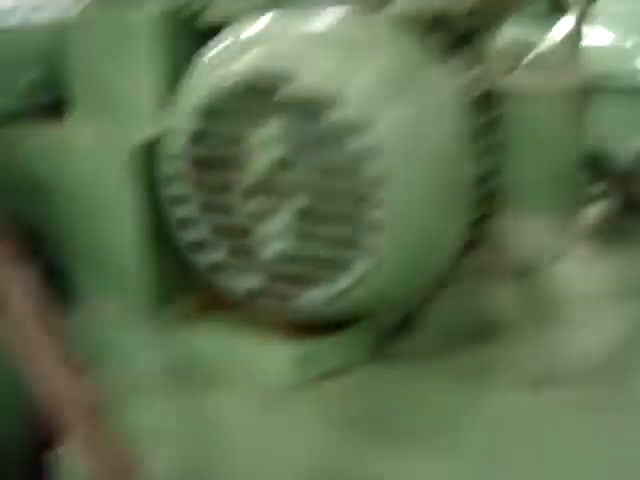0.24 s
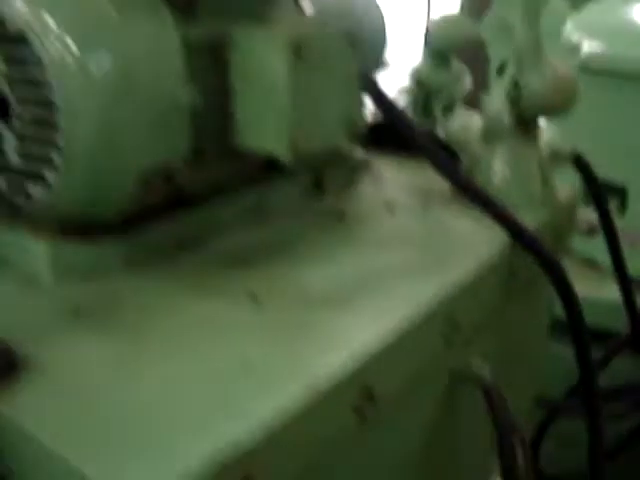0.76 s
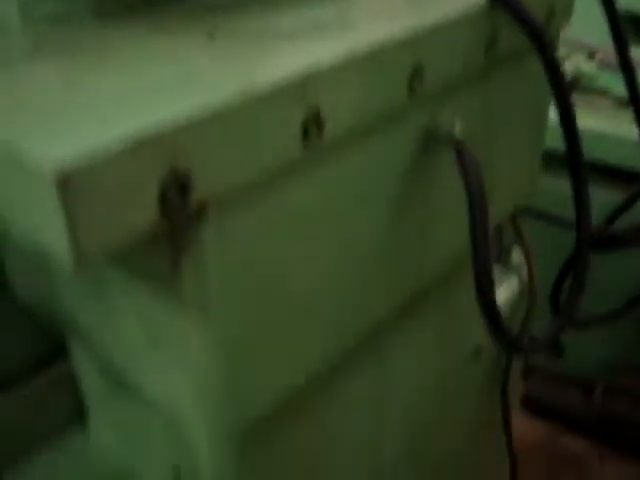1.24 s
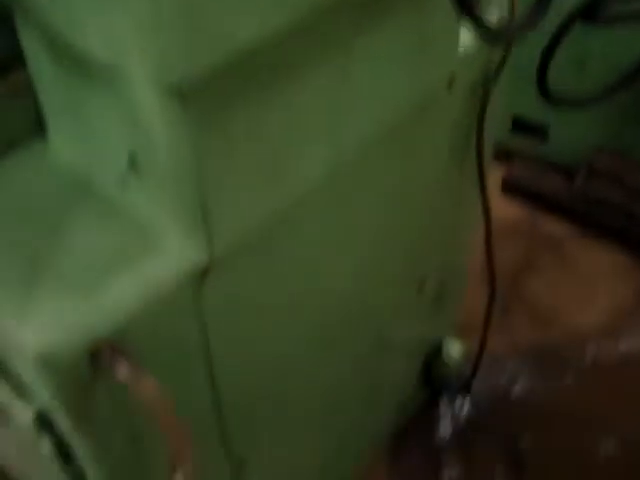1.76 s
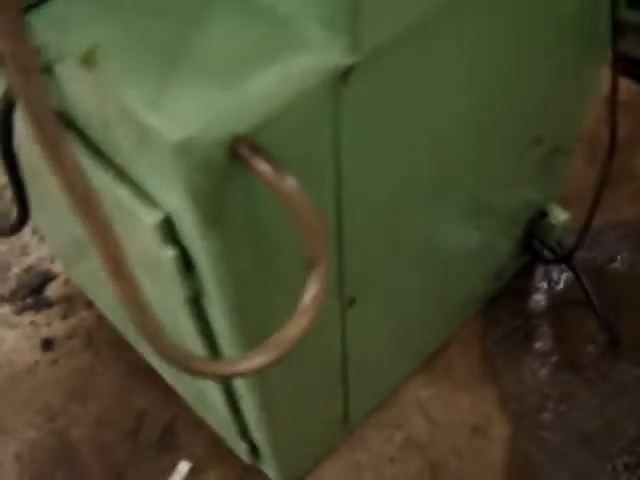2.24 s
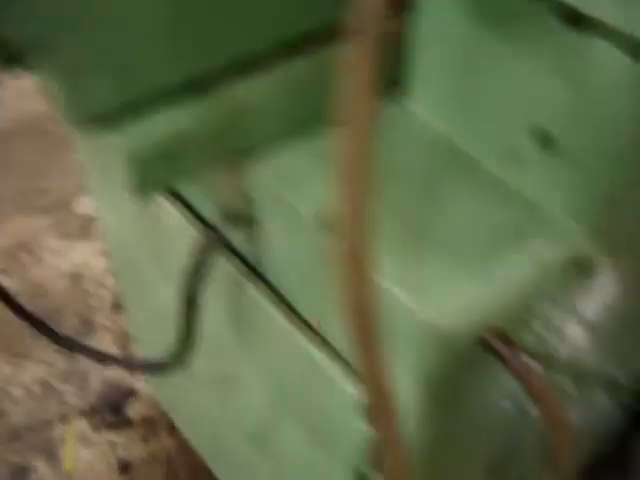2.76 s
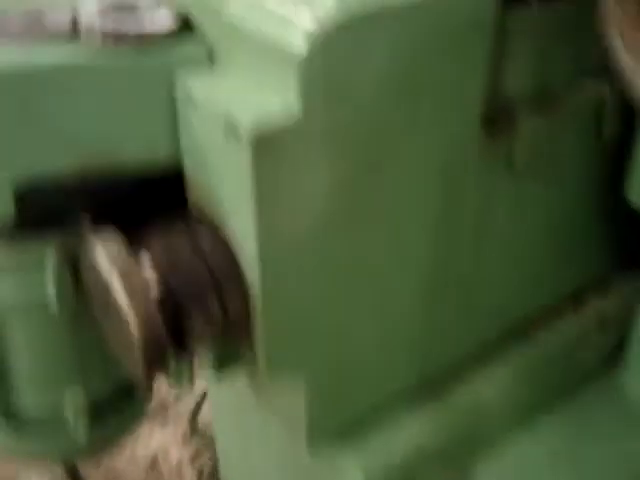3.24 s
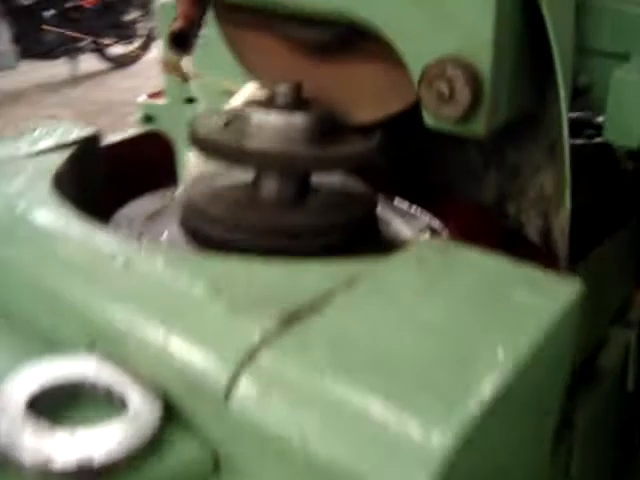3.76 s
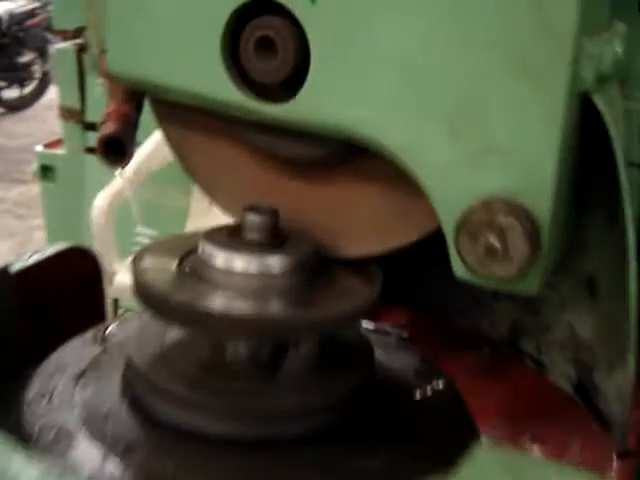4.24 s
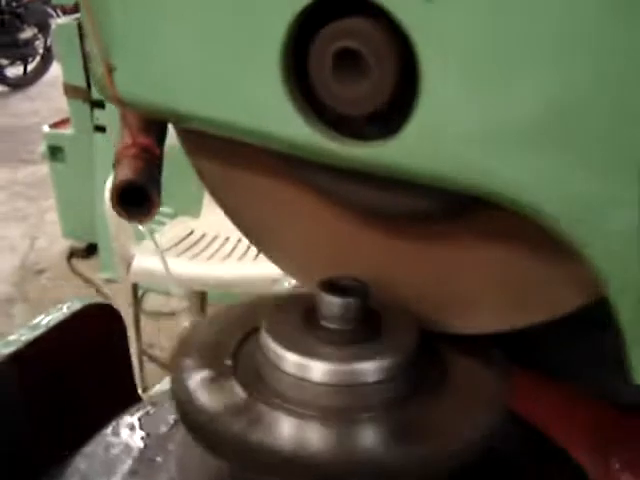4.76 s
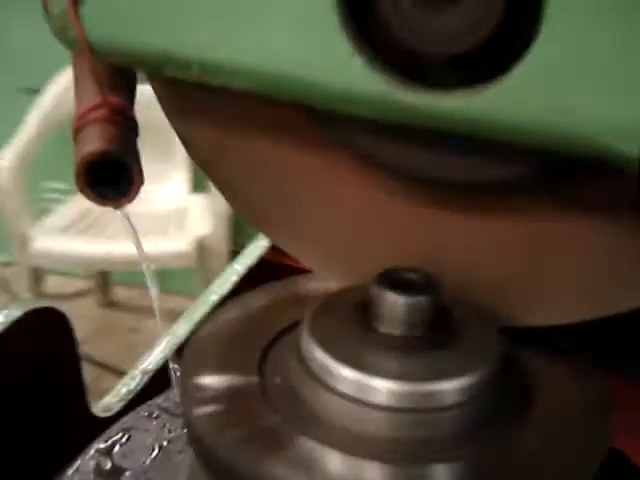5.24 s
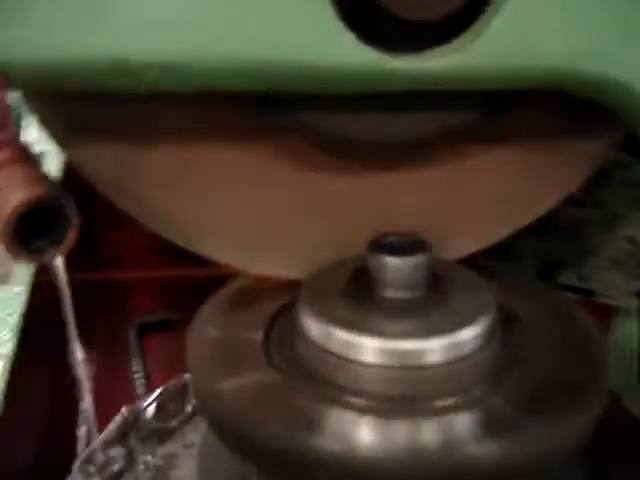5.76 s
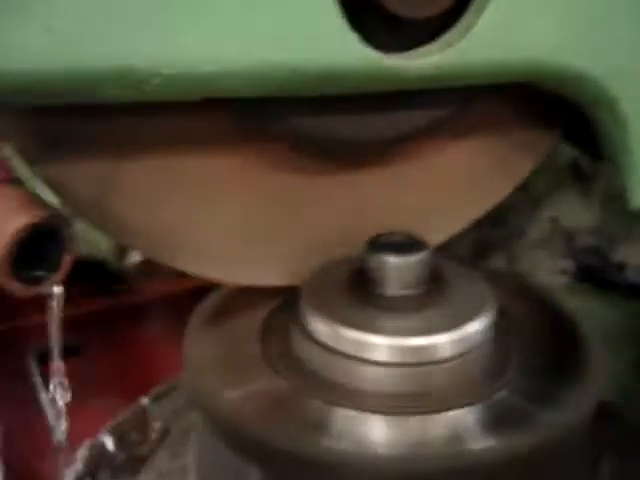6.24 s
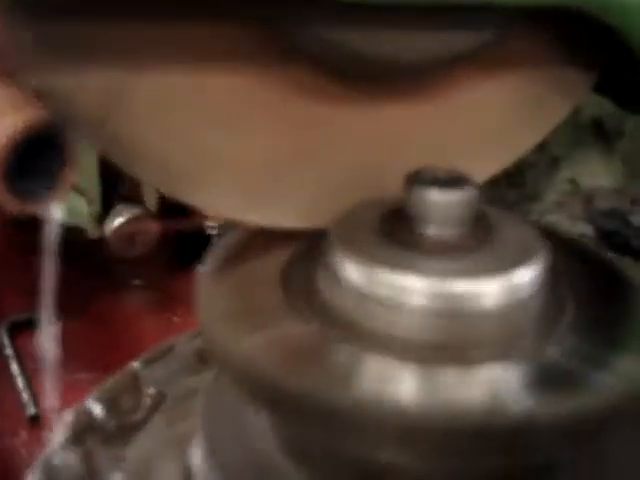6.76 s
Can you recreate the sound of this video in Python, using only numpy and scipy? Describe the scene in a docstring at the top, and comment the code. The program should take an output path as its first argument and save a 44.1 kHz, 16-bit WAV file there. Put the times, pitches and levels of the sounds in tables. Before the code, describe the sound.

Close, continuous machine noise: throbbing mid-low rumble, wavering motor tones and pump whine, then sharper metallic grinding hiss as the microphone nears the wheel.

```python
"""A workshop, where a mono microphone is carried past the hydraulic pump of a wet grinding machine round to its wheel.
The pump whines in harmonics; motors and spindle hold tones; the drive throbs as shaped noise in the cast base.
The wheel's grit, noise that partly repeats every turn, scrapes a steel disc; disc and guard ring and hiss.
Coolant drops patter faintly against the guard."""
import sys
import numpy as np
from scipy import signal
from scipy.fft import rfft, irfft, next_fast_len
from scipy.io import wavfile
from scipy.ndimage import uniform_filter1d, map_coordinates

SR = 44100
rng = np.random.default_rng(int(sys.argv[2]) if len(sys.argv) > 2 else 0)


def master(y):
    """Save y as 16-bit WAV."""
    cut = np.clip(np.atleast_2d(y).T, -1, 1)
    pcm = np.round(cut * 32767)  # scale
    wavfile.write(sys.argv[1], SR, pcm.astype(np.int16))


N = 309141
TOP_HZ = 10050  # band limit of grit and recorder
WHEEL_HZ = 41.8

# loudness of the cast base along the walk: t/s, level/dB
BASE_LEVEL = [(0, -23), (.5, -25), (1.4, -24), (2.3, -22), (2.85, -20.5), (3.4, -23), (3.8, -24.5),
              (4.3, -26), (5.2, -28), (5.7, -31.4), (6.1, -30.5), (6.6, -27.5), (7, -28)]


def amp(db):
    """Decibels to gain."""
    return 10 ** (np.asarray(db) / 20)


def unit(x):
    """Scale to rms 1."""
    return x / np.sqrt(np.mean(x ** 2) + 1e-20)


def curves(rows):
    """One value per sample for each column after the time."""
    t_s, *cols = np.transpose(rows)
    return [np.interp(np.arange(N) / SR, t_s, c) for c in cols]


def wobble(rate_hz):
    """Smooth random curve with rate_hz knots a second."""
    knots = rng.standard_normal(4096)
    coarse = np.arange(0, N + 32, 32)
    values = map_coordinates(knots, [coarse * rate_hz / SR], mode="wrap")
    return np.interp(np.arange(N), coarse, values)


def nearness(t_s, half_s):
    """Inverse-square bell: 1 at t_s, where the microphone is nearest, and 1/2 at half_s either side."""
    return 1 / (1 + ((np.arange(N) / SR - t_s) / half_s) ** 2)


def filtered(x, response):
    """x times a response of frequency."""
    m = next_fast_len(N + 8192)
    return irfft(rfft(x, m) * response(np.fft.rfftfreq(m, 1 / SR)), m)[:N]


def coloured(x, points):
    """x shaped by (f/Hz, relative level/dB) points, falling away beyond their ends, at rms 1."""
    f_hz, db = np.transpose(points)
    log_f = np.log(np.r_[f_hz[0] / 2, f_hz, f_hz[-1] * 2])
    db = np.r_[db[0] - 20, db, -120]
    return unit(filtered(x, lambda hz: amp(np.interp(np.log(hz + 1), log_f, db, left=-120))))


def resonance(f, hz, width_hz):
    """Response of one mode, 1 at its centre."""
    return 1j * f * width_hz / (hz * hz - f * f + 1j * f * width_hz)


def blend(a, b, share):
    """Equal-power mix with the given share of b."""
    share = np.clip(share, 0, 1)
    return np.sqrt(1 - share) * a + np.sqrt(share) * b


def turns(hz, drift, flutter):
    """Running count of cycles of a shaft whose speed wanders slightly, slowly (drift) and fast (flutter)."""
    return np.cumsum(hz * (1 + drift * wobble(2) + flutter * wobble(25))) / SR


def tone(hz, flutter, waver_db):
    """Held tone of rms 1 that wavers in pitch and strength."""
    cycles = turns(hz, drift=0.000915, flutter=flutter)
    return unit(np.sin(2 * np.pi * cycles) * amp(waver_db * wobble(9)))


def wall_echo(x):
    """A close wall adds a copy half a period late, which cuts a gliding notch."""
    # tank wall as the microphone slides down it: t/s, notch f/Hz, echo strength 0-1
    wall = [(.6, 427, 0), (1.1, 486, 0.15), (1.4, 550, 0.12), (1.65, 637, 0.1), (2.0, 690, 0.26),
            (2.6, 700, 0.2)]
    notch_hz, strength = curves(wall)
    n = np.arange(N)
    echo = np.interp(n - SR / (2 * notch_hz), n, x)
    return (x + strength * echo) / np.sqrt(1 + strength ** 2)


def standing_waves(x, patchy_db):
    """Narrow bands swell and fade as the microphone moves among hard surfaces."""
    z = signal.stft(x, nperseg=1024)[2]
    field = rng.standard_normal(z.shape)
    for _ in range(2):
        field = uniform_filter1d(field, size=4, axis=0)
        field = uniform_filter1d(field, size=40, axis=1)
    return signal.istft(z * amp(patchy_db * unit(field)), nperseg=1024)[1][:N]


def coolant(front):
    """Drops flung off the wheel patter faintly: random impulses excite two broad modes of the guard."""
    drops = rng.uniform(size=(900, 2))
    at = (drops[:, 0] * (N - 1)).astype(int)
    ticks = np.bincount(at, drops[:, 1] ** 2, N)
    splash = filtered(ticks, lambda f: resonance(f, 2680, 2000) ** 2 + resonance(f, 6000, 1800) ** 2)
    return amp(-40.0 + 7.5 * front) * unit(splash)


def pump(front):
    """Vanes whine in harmonics that swell as the microphone crosses crests of the room's standing waves."""
    pump_hz, shadow_db = 393.8, 8  # shadow: loss with the machine between pump and microphone
    # harmonics: multiple of pump_hz, level/dB away from crests and shadow
    vane_orders = [(3, -40), (4, -42.5), (5, -42.5), (6, -38), (7, -41), (8, -43), (9, -40.5), (11, -47.5),
                   (14, -42.5)]
    # standing-wave crests: multiple of pump_hz, t/s, half time/s, lift/dB
    vane_crests = [(3, .4, 0.37, 6), (4, 0.83, 0.54, 9), (4, 4.35, .45, 8.5), (5, 1, 0.31, 9.5),
                   (6, 2.11, 0.33, 8), (6, 0.27, .4, 6), (8, 0.22, .8, 10), (9, 1.3, 0.45, 4.5)]
    vane = 2 * np.pi * turns(pump_hz, drift=0.000519, flutter=0.00086)
    whine = 0
    for order, db in vane_orders:
        crest_db = sum(lift_db * nearness(t_s, half_s) for k, t_s, half_s, lift_db in vane_crests if k == order)
        level_db = db + crest_db + 1.0 * wobble(1.7) + 0.63 * wobble(11)
        harmonic = np.sin(order * vane + rng.uniform(0, 2 * np.pi))
        whine = whine + amp(level_db) * unit(harmonic)
    return amp(-shadow_db * front ** 3) * whine


def drive(front):
    """Spindle and motors hold wavering tones, and steady lines sound behind and in front of the machine; the
    spindle's drone lies near twelve times the wheel's speed."""
    drone_hz = 502.8
    # spindle drone, with a dead spot behind the tank: t/s, level/dB
    drone_level = [(0, -32.5), (.3, -25.5), (.7, -29), (1.05, -62), (1.5, -54), (1.85, -32.5), (2.55, -36),
                   (2.85, -28.5), (3.5, -32), (4.2, -30), (4.6, -30.5), (5.3, -26.5), (5.8, -31),
                   (6.4, -25.5), (7, -29.5)]
    # held tones of motors and spindle: name: (f/Hz, flutter share)
    held_tones = {"hum": (85.5, .012), "upper drone": (543.7, .0065), "whine": (1223, .004),
                  "whistle": (3763, .0015), "squeal": (8625, .002)}
    # where they are strong: tone name, nearest t/s, half time/s, level when nearest/dB
    held_passes = [("hum", 2.5, 1, -53), ("upper drone", 2.22, 0.22, -32.5),
                   ("upper drone", 3.06, 0.37, -29), ("upper drone", 4.74, 0.73, -28.5),
                   ("whine", 4.38, 0.68, -38), ("whistle", 3.6, 1, -35), ("squeal", 5.18, 0.33, -33.5)]
    # steady tones behind the machine, in front of it: f/Hz, level/dB
    rear_tones = [(134.6, -55.5), (269.2, -47), (753.7, -35), (1044, -37.5)]
    front_tones = [(251, -53), (314, -48.5), (461, -51.5), (640, -43.5), (1008, -42), (2547, -40),
                   (2757, -36.5)]
    drone_db, = curves(drone_level)
    held = amp(drone_db) * tone(drone_hz, flutter=.002, waver_db=.8)
    for name, (hz, flutter) in held_tones.items():
        passes = [row[1:] for row in held_passes if row[0] == name]
        strength = sum(amp(db) * nearness(t_s, half_s) for t_s, half_s, db in passes)
        held = held + strength * tone(hz, flutter, waver_db=2.4)
    rear = sum(amp(db) * tone(hz, flutter=0.00474, waver_db=2.5) for hz, db in rear_tones)
    ahead = sum(amp(db) * tone(hz, flutter=0.001705, waver_db=1.5) for hz, db in front_tones)
    return held + blend(rear, ahead, front)


def base(front, belt):
    """The drive shakes cast base and panels: noise throbbing with the pump's belt behind, the wheel's in front."""
    pump_belt_hz = 19.0
    # rumble spectra behind, in front: f/Hz, relative level/dB
    base_rear = [(25, -37.5), (70, -20), (120, -24.5), (175, -22), (215, -7.5), (340, -9), (410, -3.5),
                 (470, -3), (620, 3.5), (700, 2), (780, 1.5), (900, 1), (1230, -5.5), (1400, -30.5)]
    base_front = [(25, -33), (70, -29), (150, -21), (210, -11.5), (350, -12), (400, -1), (530, 3),
                  (600, 1.5), (720, -1), (810, 3.5), (880, 0), (1130, -6.5), (1250, -1), (1400, -57)]
    # sheet panels passed in turn: f/Hz, width/Hz, nearest t/s, half time/s, level when nearest/dB
    panel_passes = [(209, 32, 2.2, 0.46, -38.5), (272.2, 32, 1.84, 1.8, -42), (406.7, 21, 1.5, 1.03, -31.5),
                    (607, 30, 1.046, 0.24, -25.5), (781, 77, 1.52, 0.82, -26.5),
                    (1050, 90, 2.75, 0.23, -27.5)]
    base_db, = curves(BASE_LEVEL)
    pump_belt = 2 * np.pi * turns(pump_belt_hz, drift=.005, flutter=.01)
    throb = np.cos(pump_belt) + .5 * np.cos(2 * pump_belt)
    surge = unit(amp(2.1 * (1 - front) * throb + 1.3 * front * belt))
    rear = wall_echo(coloured(rng.standard_normal(N), base_rear))
    ahead = coloured(rng.standard_normal(N), base_front)
    rumble = amp(base_db + 0.5 + 0.5 * front) * blend(rear, ahead, front)
    for hz, width_hz, t_s, half_s, db in panel_passes:
        panel = filtered(rng.standard_normal(N), lambda f: resonance(f, hz, width_hz) ** 2)
        rumble = rumble + amp(db) * nearness(t_s, half_s) * unit(panel)
    return surge * rumble


def grit(wheel, repeat):
    """Scraping noise: the face replays its roughness each turn, mixed with grains that break off anew."""
    count = int(TOP_HZ / WHEEL_HZ)
    bumps = amp(2.6 * rng.standard_normal(count)) * np.exp(2j * np.pi * rng.uniform(size=count))
    face = unit(irfft(np.r_[0, bumps], 8192)) * np.sqrt(2 * TOP_HZ / SR)  # density of the white noise
    same = np.interp(wheel % 1, np.arange(len(face)) / len(face), face)
    return blend(rng.standard_normal(N), same, repeat)


def bite(wheel, front):
    """Cutting force of the slightly oval wheel; each part feels it at its own point of the turn."""
    angle = 2 * np.pi * (wheel + rng.uniform())
    oval = 1.3 * np.cos(angle) + 1.93 * np.cos(2 * angle) + 1.0 * np.cos(3 * angle)
    chatter = np.cos(12 * angle)
    force_db = (0.9 + 0.55 * front) * oval + 0.81 * chatter + 0.47 * wobble(18) + 1.5 * wobble(70)
    return unit(amp(force_db))


def sing(x, share):
    """A resonance driven by friction saturates: its strength evens out and it sings steadily."""
    strength = np.abs(signal.hilbert(x, next_fast_len(N))[:N])
    return x / (strength / strength.mean() + .1) ** np.clip(share, 0, 1)


def steel_ring(front, belt, work, wheel, forces, guard_db, disc_db):
    """Modes of guard, disc and rim ring under the grit, most of them beaming into one stretch of the walk."""
    disc_from_hz, rim_from_hz = 4800, 6300
    # modes: f/Hz, width/Hz, level against guard or disc/dB, gain at wheel/dB, beam axis t/s, beam half time/s,
    # beam lift/dB, share repeating each turn 0-1, belt throb/dB, work throb/dB (throbs at the wheel), singing 0-1
    steel = [(2090, 380, -10, 3, 5.4, 0.39, 1.5, 0.1, 4, -0.5, 0.15),
             (2673, 326, -9, 3.5, 3, 0.91, 5, 0.54, -1.5, -0.7, 0.24),
             (3980, 195, -20, 11, 3.6, 0.86, 5.5, 0.7, -1.5, -1, 0.56),
             (5233, 420, -12.5, -4.5, 4.93, 0.8, 12, 0.64, -1.5, 4, 0.46),
             (5630, 800, -6, -1.5, 1.4, 1, 6.5, 0.5, -1.7, 2.5, 0.06),
             (6130, 310, -23.5, 8.5, 5.56, 0.41, 8.5, 0.3, -3, -4.5, .05),
             (6697, 350, -4.5, -1.5, 3.6, 0.71, 2.5, 0.49, 1.2, 1, 0),
             (7675, 460, -15, 4.5, 13, 0.71, 12, 0, 0.5, -4, 0),
             (8880, 200, -26, 2.5, 6.5, 0.72, 15.5, 0.5, -3, 5, 0)]
    on_guard, on_disc, on_rim = forces
    ring = 0
    for hz, width_hz, db, front_db, t_s, half_s, lift_db, repeat, belt_db, work_db, singing in steel:
        if hz < disc_from_hz:
            force, part_db = on_guard, guard_db
        else:
            force, part_db = (on_disc if hz < rim_from_hz else on_rim), disc_db
        mode = filtered(force * grit(wheel, repeat), lambda f: resonance(f, hz, width_hz) ** 2)
        throb_db = (.4 + .6 * front) * (belt_db * belt + work_db * work) + 1.3 * wobble(35)
        level_db = part_db + db + front_db * front + lift_db * nearness(t_s, half_s)
        ring = ring + amp(level_db) * unit(sing(mode * amp(throb_db), singing))
    return ring


def grinding(front, belt):
    """Grit scrapes, rasps, hisses and rings the steel; wheel belt and turning work make it throb."""
    work_hz = 9.8
    # loudness of guard, disc and sizzling spray along the walk: t/s, level/dB
    guard_level = [(0, -24.5), (1, -27), (2.3, -28), (3.2, -25.5), (3.45, -23), (3.7, -25), (4.25, -23),
                   (5.2, -24), (6.05, -31.5), (6.45, -25), (7, -25.5)]
    disc_level = [(0.0, -24.5), (0.53, -30), (0.8, -26.5), (1.09, -29), (1.54, -27.5), (2.73, -30),
                  (2.95, -24.5), (3.08, -28), (3.55, -22), (4.63, -24.5), (5.45, -21.5), (6.4, -24),
                  (6.95, -21.5), (7.01, -21.5)]
    spray_level = [(0, -33), (1, -36), (2.2, -39), (3, -35.5), (4.2, -32.5), (4.8, -35), (5.6, -29),
                   (7, -31)]
    # noise spectra: f/Hz, relative level/dB
    scrape_points = [(600, -45), (1300, 1.5), (1750, -1), (2400, -0.5), (2900, -7), (3400, -0.5)]
    rasp_points = [(2300, -18), (3050, -2), (3450, 2.5), (3800, 2.5), (4300, -3.5), (4900, -0.5),
                   (6000, -40)]
    hiss_points = [(4000, -32.5), (4850, -16.5), (5120, 4.5), (5500, 4.5), (5900, -5.5), (6400, 14),
                   (7150, 3), (7700, -8), (10000, -34)]
    spray_points = [(5500, -50), (7200, 9), (7950, 0.5), (8350, 4), (8700, 5), (9200, 2.5), (10000, 1)]
    levels = (BASE_LEVEL, guard_level, disc_level, spray_level)
    (base_db,), (guard_db,), (disc_db,), (spray_db,) = map(curves, levels)
    wheel = turns(WHEEL_HZ, drift=.0004, flutter=.001)
    work = np.cos(2 * np.pi * turns(work_hz, drift=.012, flutter=.03))
    on_guard, on_disc, on_rim = bite(wheel, front), bite(wheel, front), bite(wheel, front)
    on_spray = np.cbrt(on_disc * on_rim * bite(wheel, front))  # flung coolant follows the cut only loosely

    # the scrape follows 0.48 of the base's swings in level
    scrape_db = -30 + 0.48 * (base_db - base_db.mean()) + front * (-2.5 + 1.8 * belt)
    rasp_db = guard_db - 7.5
    hiss_db = disc_db - 5 + front * (-0.5 + 0.75 * work)
    scrape = amp(scrape_db) * coloured(grit(wheel, repeat=0.032), scrape_points)
    rasp_grit = on_guard * grit(wheel, repeat=0.2 + 0.7 * front)
    rasp = amp(rasp_db) * coloured(rasp_grit, rasp_points)
    hiss = amp(hiss_db) * coloured(on_spray * grit(wheel, repeat=0.35), hiss_points)
    spray = amp(spray_db) * coloured(on_spray * grit(wheel, repeat=0.5), spray_points)
    ring = steel_ring(front, belt, work, wheel, (on_guard, on_disc, on_rim), guard_db, disc_db)
    return ring + standing_waves(scrape + rasp + hiss + spray, patchy_db=2)


def scene():
    """All parts of the machine, alike in both channels."""
    wheel_belt_hz = 16.3
    # microphone's place: t/s, 0 beside the pump to 1 at the wheel
    front_path = [(0, 0.39), (.8, 0), (2.5, 0.1), (3.6, 0.39), (5, 1), (7.01, 0.86)]
    front, = curves(front_path)
    belt = np.cos(2 * np.pi * turns(wheel_belt_hz, drift=.008, flutter=.02))
    machine = coolant(front) + pump(front) + drive(front) + base(front, belt) + grinding(front, belt)
    return np.array([machine, machine])


def record(dry):
    """The recorder keeps nothing above its band limit."""
    return np.array([filtered(channel, lambda hz: hz < TOP_HZ) for channel in dry])


dry = scene()
out = record(dry)
master(out)
```